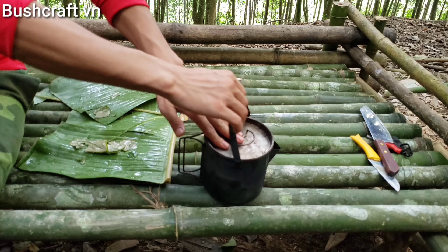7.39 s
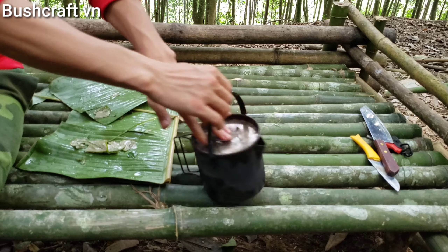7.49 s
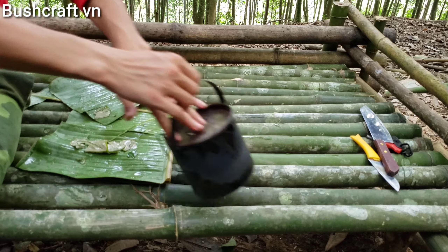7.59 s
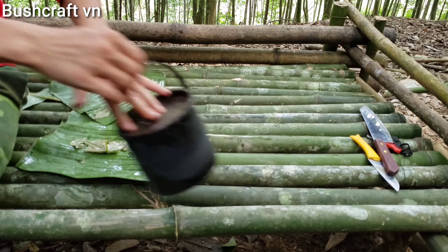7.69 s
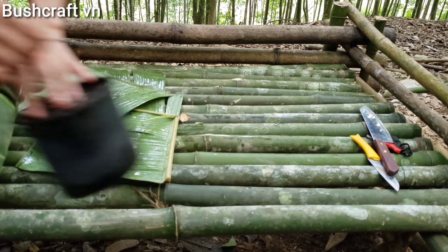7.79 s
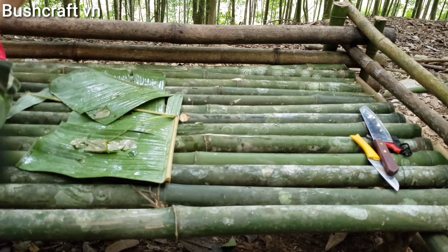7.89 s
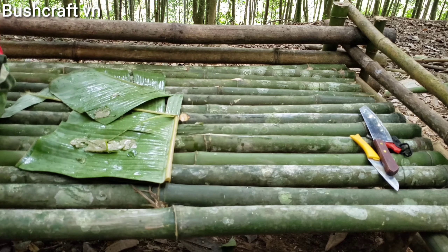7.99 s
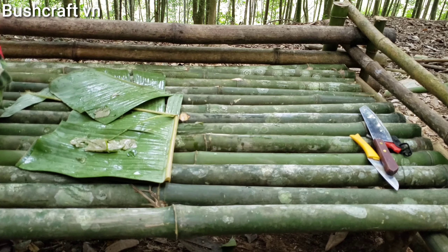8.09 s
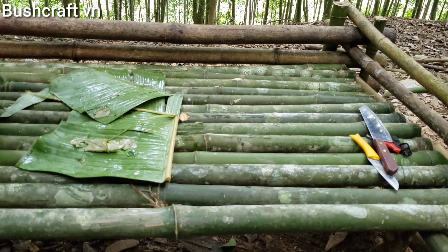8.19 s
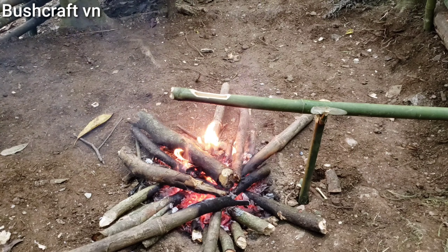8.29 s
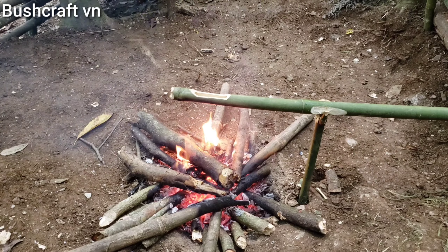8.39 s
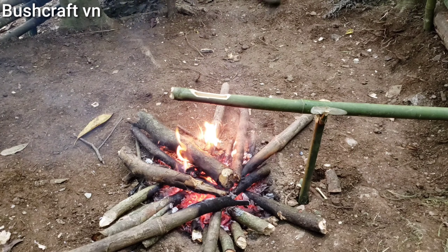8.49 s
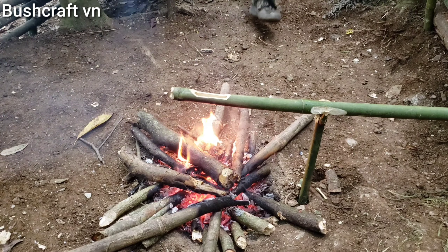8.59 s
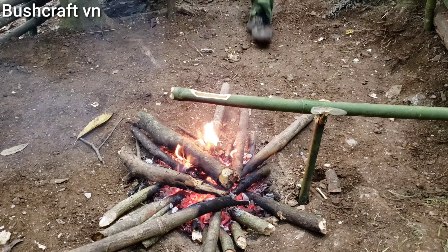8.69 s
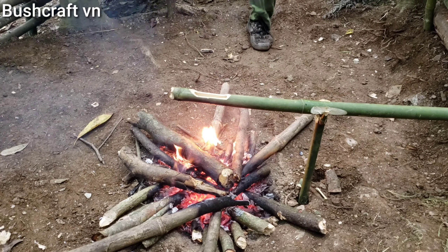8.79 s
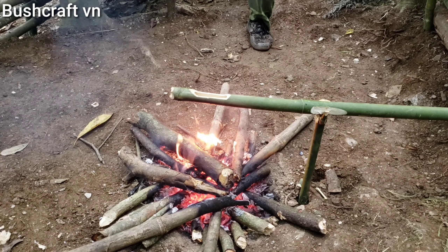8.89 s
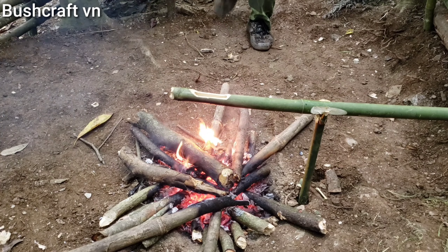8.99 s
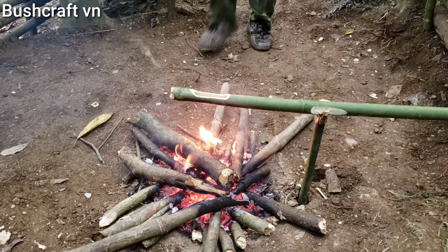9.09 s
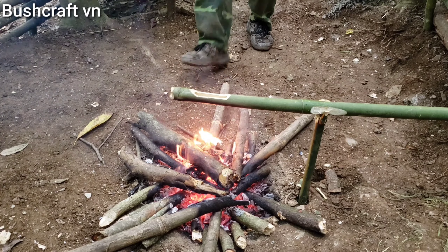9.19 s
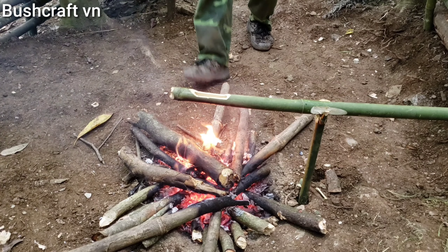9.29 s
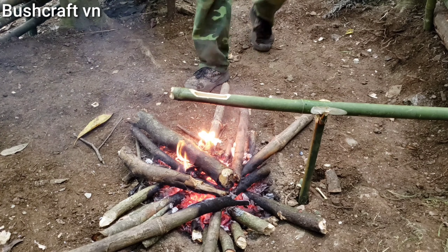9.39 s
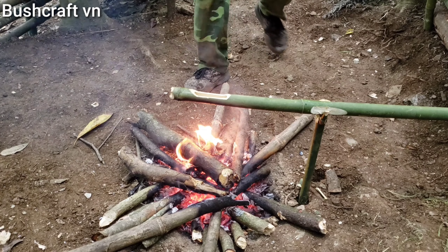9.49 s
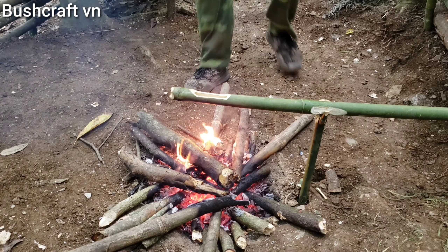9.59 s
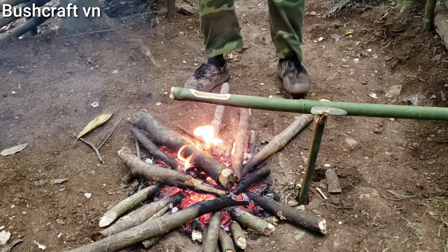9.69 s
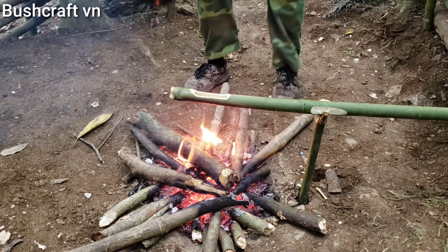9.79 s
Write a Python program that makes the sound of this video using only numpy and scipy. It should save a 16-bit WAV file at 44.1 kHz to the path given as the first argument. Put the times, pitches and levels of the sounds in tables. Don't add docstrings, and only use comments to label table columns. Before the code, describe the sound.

Outdoors in a bamboo forest, cicadas whine steadily and birds give short whips and pips over a soft distant rumble. Close to a stereo microphone pair, a metal pot clanks and rings early on, and fire snaps follow in scattered ticks. A softer pot touch and a hard, damped jangling blow come midway, then dull wooden knocks and sharp bright pops, with soft dove coos at the end.

```python
import sys
import numpy as np
from scipy import signal
from scipy.io import wavfile
from scipy.ndimage import uniform_filter1d

SR = 44100
rng = np.random.default_rng(int(sys.argv[2]) if len(sys.argv) > 2 else 0)


def log_audio(samples):
    frames = np.atleast_2d(samples).T
    limited = np.clip(frames, -1, 1)
    pcm = np.round(limited * 32767).astype(np.int16)
    wavfile.write(sys.argv[1], SR, pcm)


def elevation(decibels):
    levels = np.asarray(decibels, float)
    return 10 ** (levels / 20)


N = 433944


def rms_one(x):
    return x / np.sqrt(np.mean(x ** 2) + 1e-20)


def at_hz(points, hz):
    point_hz, value = np.transpose(points)
    return np.interp(np.log(hz), np.log(point_hz), value)


def time_axis(length_s):
    return np.arange(int(SR * length_s)) / SR


def progress(length_s):
    return np.arange(int(length_s * SR)) / (length_s * SR)


def drift(rate_hz):
    r = np.exp(-80 * np.pi * rate_hz / SR)
    white = rng.standard_normal(N // 40 + 2002)
    slow = signal.lfilter([1], [1, -2 * r, r * r], white)[2000:]
    return np.interp(np.arange(N) / 40, np.arange(len(slow)), rms_one(slow))


def band(x, low_hz, high_hz):
    sos = signal.butter(2, [low_hz, min(high_hz, .45 * SR)], "band", fs=SR, output="sos")
    return signal.sosfilt(sos, x)


def resonance(x, hz, width_hz):
    r = np.exp(-np.pi * width_hz / SR)
    zeros = np.array([1, 0, -1]) * (1 - r * r) / 2
    return signal.lfilter(zeros, [1, -2 * r * np.cos(2 * np.pi * hz / SR), r * r], x)


def add(out, start_s, sound):
    at = round(start_s * SR)
    room = min(sound.shape[-1], N - at)
    out[..., at:at + room] += sound[..., :room]


def place(x, pan_db, left_lag):
    lag = round(left_lag)
    left = np.pad(x, (max(lag, 0), 64))[:len(x)]
    right = np.pad(x, (max(-lag, 0), 64))[:len(x)]
    return np.array([left * elevation(pan_db / 2), right * elevation(-pan_db / 2)])


def scatter(x, t60, delay_s):
    t = time_axis(.8)
    decay = elevation(-60 * t / t60) + 2.0 * elevation(-240 * t / t60)
    tail = rng.standard_normal((2, len(t))) * decay * (1 - np.exp(-t / delay_s))
    tail = tail / np.sqrt(np.sum(tail ** 2) / 2)
    return signal.fftconvolve(x[None], tail, axes=1)[:, :N]


# pitch_hz, likeness (0 to 1)
LIKENESS = [(30, 1), (125, 0.91), (250, 0.81), (500, 0.32), (1000, 0), (4000, 0.043), (16000, 0.081)]


def banded_noise(spectrum, patchy_db):
    out, edges = 0, 24 * 2 ** np.arange(0, 10, .5)
    white = rng.standard_normal((2, 2, N))
    for k, (low, high) in enumerate(zip(edges, edges[1:])):
        hz = np.sqrt(low * high)
        mid, side = band(white[k % 2], low, high)
        alike = np.clip(at_hz(LIKENESS, hz), -1, 1)
        gain = elevation(at_hz(spectrum, hz) + patchy_db * drift(3.5))
        out = out + gain * (np.sqrt(1 + alike) * mid + np.sqrt(1 - alike) * side * [[1], [-1]])
    return rms_one(out)


# time_s, cicada_db, rumble_db, hiss_db
FOREST = [
    (0.0, -54, -51, -61.5),
    (9.7, -54, -50.5, -62.5),
    (9.84, -52, -50, -59),
]


def forest_swell():
    time_s, *levels = np.transpose(FOREST)
    return [elevation(np.interp(np.arange(N) / SR, time_s, level_db)) for level_db in levels]


# pitch_hz, level_db (per Hz)
RUMBLE = [(15, -59), (25, -9.5), (134, -4), (232, -7.5), (430, -7.5), (644, -14.5), (1010, -20),
          (1510, -34), (2120, -40), (2450, -30.5), (4000, -27), (5200, -82), (8800, -120)]


def rumble():
    return elevation(2.0) * banded_noise(RUMBLE, 1.0)


# pitch_hz, level_db (per Hz)
HISS = [(900, -20), (2000, 4), (3500, 3), (6500, -9.5), (8500, 15.5), (12000, -13.5), (15500, 0)]


def leaf_hiss():
    return elevation([[6.5], [5.5]]) * banded_noise(HISS, .8)


# pitch_hz, width_hz, level_db
CICADA_BODY = [(4665, 256, 0.5), (4872, 350, 1.5), (5110, 400, -3)]
CICADA_PATTERN = [-24.5, -13, -4, -19]


def cicadas():
    cycle_hz = 26.24
    turns = np.cumsum(4 * cycle_hz * (1 + .006 * drift(.5))) / SR
    strength = elevation(np.array(CICADA_PATTERN)[turns.astype(int) % 4])
    buckle = strength * np.exp(-(turns % 1) / 0.27)
    chorus = 0.35 * elevation(1.0 * drift(2.9))
    drive = rng.standard_normal((2, N)) * (chorus + buckle)
    body = 0
    for k, (hz, width_hz, level_db) in enumerate(CICADA_BODY):
        body = body + elevation(level_db) * resonance(drive, hz, width_hz) * (-1) ** k
    return elevation(3) * rms_one(band(body, 4450, 5610)) * elevation([[1.0], [-1.0]])


# first_chirp_s, last_chirp_s, level_db
KATYDID = [
    (.2, 2.1, -63.5),
    (4.19, 6.2, -64),
    (7.86, 9.8, -63.5),
]


def katydid():
    pitch_hz, period_s, chirp_s = 8470, 0.237, 0.14
    t, gate = np.arange(N) / SR, np.zeros(N)
    for first_s, last_s, level_db in KATYDID:
        u = (t - first_s) % period_s / chirp_s
        swell = np.sin(np.pi * np.minimum(u, 1)) ** 0.21
        gate += elevation(level_db) * (t > first_s) * (t < last_s) * swell
    rasp = resonance(resonance(rng.standard_normal((2, N)), pitch_hz, 330), pitch_hz, 330)
    return gate * rms_one(rasp) * elevation([[-1.5], [1.5]])


def glide(length_s, from_hz, to_hz, bend, kick=0):
    u = progress(length_s)
    unsteady = 1 + 0.014 * uniform_filter1d(rng.standard_normal(len(u)), size=200) * 14
    goal_hz = to_hz * (1 - kick + kick * u ** 7.5)
    approach_hz = (from_hz - to_hz * (1 - kick)) * (1 - u) ** bend
    return 2 * np.pi * np.cumsum((goal_hz + approach_hz) * unsteady) / SR, u


def whip(length_s, from_hz, to_hz, level_db, late):
    phase, u = glide(length_s, from_hz, to_hz, 1.12, kick=.05 * (late > 2))
    beads = 1 + 0.5 * np.sin(2 * np.pi * 52 * length_s * u + rng.uniform(0, 2 * np.pi))
    swell = np.sin(np.pi * u ** late) ** 0.85 + 0.15 * np.sin(np.pi * u) ** .5
    grain = 1 + 5.5 * uniform_filter1d(rng.standard_normal(len(u)), size=70) * u
    return elevation(level_db + 6.5) * swell * beads * grain * np.sin(phase)


# start_s, length_s, from_hz, to_hz, level_db
LONG_WHIPS = [(.905, .068, 1550, 3550, -48), (1.582, .064, 1800, 3650, -46), (3.792, .05, 2100, 2900, -55),
              (4.876, .066, 1700, 3500, -48), (6.848, .047, 1600, 3550, -46),
              (7.946, .052, 1750, 3500, -51), (8.972, .06, 1800, 3200, -48), (9.148, .054, 2080, 3000, -56),
              (9.23, .06, 1610, 2810, -57), (9.688, .064, 1650, 3700, -45)]


def long_whips(out):
    for start_s, *stroke in LONG_WHIPS:
        add(out, start_s, whip(*stroke, late=3.0))


# start_s, length_s, from_hz, to_hz, level_db
STROKES = [
    (.287, .015, 3550, 3100, -55),
    (.301, .016, 3100, 3600, -53),
    (3.19, .025, 2300, 3900, -57),
    (6.231, .012, 3750, 3150, -55),
    (6.31, .022, 4300, 2500, -56),
    (6.42, .013, 4000, 3000, -58),
    (6.893, .045, 2950, 3120, -49),
    (.968, .022, 2300, 3100, -50),
]


def lone_strokes(out):
    for start_s, *stroke in STROKES:
        add(out, start_s, whip(*stroke, late=1.2))


# start_s, first_stroke_s, from_hz, to_hz, level_db
QUICK_WHIPS = [(1.364, .022, 2200, 3300, -53), (2.051, .023, 2230, 3200, -51),
               (2.722, .038, 2000, 3200, -49), (3.213, .024, 2900, 3600, -54),
               (3.399, .022, 2700, 3800, -57), (5.312, .03, 2250, 3150, -54),
               (7.584, .034, 2250, 3450, -49), (8.729, .024, 2200, 3300, -52)]


def quick_whips(out):
    stroke_s = .021
    for start_s, first_s, from_hz, to_hz, level_db in QUICK_WHIPS:
        second_s = start_s + first_s
        add(out, start_s, whip(first_s, from_hz, to_hz, level_db - 1.5, late=1.2))
        add(out, second_s, whip(stroke_s, from_hz, to_hz, level_db, late=1.2))
        add(out, second_s + stroke_s, whip(stroke_s, from_hz, .94 * to_hz, level_db, late=1.2))


def pipe(length_s, from_hz, to_hz, level_db, octave_db):
    phase, u = glide(length_s, from_hz, to_hz, 5.0)
    hoarse = 1 + .35 * rng.standard_normal(len(u) // 60 + 1).repeat(60)[:len(u)]
    octave = elevation(octave_db) * hoarse * 1.8 * (1 - u) ** 1.3 * np.sin(2 * phase)
    tone = (.6 + .4 * hoarse) * np.sin(phase)
    return elevation(level_db + 6.5) * np.sin(np.pi * u) ** 0.15 * (tone + octave)


# start_s, length_s, held_hz, level_db, octave_db
RASPS = [(0.256, .06, 2220, -63, 10.5), (.905, .04, 2200, -66, 11), (1.574, .05, 2100, -63, 12),
         (2.21, .051, 2117, -64, 9), (2.331, .035, 2095, -63.5, 6), (2.392, .034, 2180, -64, 6),
         (3.875, .04, 2034, -57.5, 6), (3.93, .06, 1865, -60, 6), (4.868, .041, 1905, -61.5, 12),
         (5.637, .06, 1990, -64, 11.5), (5.688, .027, 2410, -61, 7), (5.745, .026, 2230, -60.5, 9.5),
         (5.791, .04, 2110, -64, 9), (5.85, .039, 1960, -65, 7), (6.157, .089, 2290, -59.5, 3),
         (6.236, .082, 2217, -57, 5.5), (6.357, .071, 2186, -58.5, 2), (7.946, .064, 2180, -65.5, 18),
         (8.069, .079, 2183, -62, 15), (8.973, .057, 2200, -68, 9), (9.16, .07, 2130, -66.5, 12),
         (9.278, .082, 2108, -67, 12), (9.687, .042, 2140, -62.5, 12.5)]


def rasps(out):
    for start_s, length_s, held_hz, level_db, octave_db in RASPS:
        add(out, start_s, pipe(length_s, 1520, held_hz, level_db, octave_db))


# start_s, length_s, held_hz, level_db
PIPS = [(0, .014, 2740, -51), (0.234, .028, 2700, -52.5), (0.294, .032, 1750, -54), (.312, .03, 3570, -56),
        (3.472, .04, 2340, -60), (4.408, .03, 2750, -62), (5.283, .038, 1920, -63),
        (6.083, .024, 2700, -48.5), (7.304, .03, 2890, -57), (7.61, .04, 1950, -56),
        (8.08, .055, 2440, -54), (8.087, .041, 1600, -61), (8.669, .045, 2875, -54.5),
        (8.884, .05, 2270, -60)]


def pips(out):
    for start_s, length_s, held_hz, level_db in PIPS:
        add(out, start_s, pipe(length_s, .91 * held_hz, held_hz, level_db, octave_db=-30))


# start_s, held_hz, level_db
WHISTLES = [(1.262, 2660, -61), (5.447, 2640, -60), (7.2, 2750, -63), (7.803, 2665, -57.5),
            (8.021, 2710, -52.5), (8.402, 2640, -58), (9.08, 2180, -58), (9.341, 2930, -58.5),
            (9.45, 2205, -61)]


def whistles(out):
    for start_s, held_hz, level_db in WHISTLES:
        add(out, start_s, pipe(.045, 1.03 * held_hz, held_hz, level_db, octave_db=-30))


# start_s, length_s, level_db
COOS = [
    (9.152, .097, -54),
    (9.348, .12, -57.5),
    (9.525, .19, -60.5),
]


def coos(out):
    coo_hz = 662
    for start_s, length_s, level_db in COOS:
        add(out, start_s, pipe(length_s, .97 * coo_hz, coo_hz, level_db, octave_db=-14))


# start_s, length_s, low_hz, top_hz, level_db
HOOKS = [(4.198, .06, 2700, 3120, -54), (4.432, .066, 2750, 3160, -54), (5.102, .064, 2640, 3100, -53),
         (5.828, .056, 2750, 3250, -51), (6.588, .062, 2500, 3150, -56), (7.123, .062, 2700, 3200, -50),
         (8.354, .06, 2650, 3200, -52), (9.066, .044, 2600, 3060, -53)]
# progress (0 to 1), height (0 low to 1 top), level_db
HOOK = [
    (0, .55, -8),
    (.3, .05, -3),
    (.58, 0, -1.5),
    (.76, 1, 3.5),
    (1, .45, -8),
]


def hooks(out):
    turns, height, swell_db = np.transpose(HOOK)
    for start_s, length_s, low_hz, top_hz, level_db in HOOKS:
        u = progress(length_s)
        phase = 2 * np.pi * np.cumsum(low_hz + (top_hz - low_hz) * np.interp(u, turns, height)) / SR
        beads = 1 + .4 * np.sin(2 * np.pi * 4.5 * u + rng.uniform(0, 2 * np.pi))
        level = elevation(level_db + 6.5 + np.interp(u, turns, swell_db))
        add(out, start_s, level * np.sin(np.pi * u) ** .3 * beads * np.sin(phase))


def birds():
    whips, pipes = np.zeros(N), np.zeros(N)
    for whip_call in (long_whips, lone_strokes, quick_whips):
        whip_call(whips)
    for pipe_call in (hooks, rasps, pips, whistles, coos):
        pipe_call(pipes)
    throat = 1.7 * resonance(whips, 3200, 1550)
    direct = elevation(-1.6) * place(throat, 4, 18) + elevation(-3.5) * place(pipes, 3, -18)
    return direct + elevation(-1.1) * scatter(throat, 0.66, 0.004) + elevation(-2.5) * scatter(pipes, 0.55, 0.016)


# start_s, level_db, pitch_hz, t60_s
THUDS = [(0.463, -43, 615, 0.065), (4.703, -37.5, 632, 0.098), (4.762, -35.5, 614, 0.034),
         (4.913, -45, 556, 0.053), (5.012, -41.5, 470, 0.046), (7.333, -31.5, 563, 0.027),
         (7.4185, -35, 482, 0.026), (8.146, -35.5, 413, 0.033), (8.466, -32.5, 568, 0.022)]


def thuds():
    out, t = np.zeros(N), time_axis(.2)
    for start_s, level_db, pitch_hz, t60_s in THUDS:
        decay = elevation(level_db + 5.5 - 60 * t / t60_s) * (1 - np.exp(-t / 0.0013))
        add(out, start_s - .002, decay * np.sin(2 * np.pi * pitch_hz * t))
    return place(out, 1.0, 0)


# start_s, level_db, hand_damps_after_s, jangle_db, jangle_t60_s
BLOWS = [
    (0.3682, -24, .19, -9, 0.57),
    (3.987, -36.5, 0.048, -12, .12),
    (4.7047, -19, 0.062, 2, 0.15),
]
POT_HZ = [1037, 1062, 1680, 1850, 2089, 2484, 2724, 2933, 3147, 3275, 3844, 4391, 4674, 5233, 5620, 6270,
          6907, 7816, 8333, 9346, 9734, 11340, 11960, 12780, 13480]
# t60_s, first_blow_db, second_blow_db, third_blow_db
POT = [(0.47, -3, -28, -35), (.05, -11, -14, 2), (0.16, -12, -2.5, -20), (.04, 8, -8, -5),
       (0.24, -11.5, -27, -33), (0.29, -32, -21, -12.5), (0.2, -23, -10, -25), (0.79, -13, -25, -16),
       (0.17, -27, -25, -17), (0.3, -23, -25, -11), (0.3, -21, -10, -13.5), (0.08, -21, -9, -4),
       (0.28, -30, -15, -3), (0.25, -21, -15, -29), (0.092, -28, -16, -13), (0.43, -24, -25, -32),
       (0.11, -24, -23, -4.5), (0.1, -17, -2, -7), (0.13, -20, -12, -18), (.12, -35, -25, -9),
       (.13, -29, -25, -19), (0.037, -22, -25, -28), (0.042, -30, -25, -26), (.12, -30, -25, -21),
       (.1, -30, -25, -20)]


def pot():
    pan_db, rattle, wash_db = [1.5, 1.5, -.3], [.3, .3, .4], [-14, -13, -6]
    out, t = np.zeros((2, N)), time_axis(.4)
    for k, (start_s, blow_db, damp_s, jangle_db, jangle_t60_s) in enumerate(BLOWS):
        damped = elevation(blow_db - 380 * np.maximum(t - damp_s, 0))
        blow = elevation(pan_db[k] * np.array([[.5], [-.5]])) * damped * (1 - np.exp(-t / 0.00038))
        for hz, (t60_s, *levels_db) in zip(POT_HZ, POT):
            phase, side_phase = rng.uniform(0, 2 * np.pi), rng.normal(0, 0.48, (2, 1))
            beat = 1 + .2 * np.sin(2 * np.pi * rng.uniform(8, 30) * t + phase)
            chatter = rms_one(uniform_filter1d(rng.standard_normal(len(t)), size=250))
            beat = beat + rattle[k] * (2000 < hz < 4000) * chatter
            ring = np.sin(2 * np.pi * hz * t + phase + side_phase)
            add(out, start_s, blow * beat * elevation(levels_db[k] - 60 * t / t60_s) * ring)
        jangle = band(rng.standard_normal((2, len(t))), 1800, 12400)
        add(out, start_s, blow * elevation(jangle_db - 60 * t / jangle_t60_s) * jangle)
        wash = resonance(rng.standard_normal((2, len(t))), 3250, 700)
        add(out, start_s, elevation(blow_db + wash_db[k] - 110 * t) * wash)
    return out


def embers():
    born = rng.random(N) < 6 / SR
    swell = signal.lfilter([1], [1, -.993], elevation(-57) * born)
    return band(swell * rng.standard_normal((2, N)), 2330, 22000)


def snap(out, start_s, top_db, wood_db, middle_db, t60_s, pan_db):
    t = time_axis(.2)
    white = rng.standard_normal((2, len(t)))
    grains = white * elevation(2.3 * rng.standard_normal(len(t) // 16 + 1).repeat(16)[:len(t)])
    burst = grains * (1 - np.exp(-t / 0.00073)) * elevation(-60 * t / max(t60_s, .004))
    top = band(burst, 4000, 14200) + elevation(middle_db) * band(burst, 2140, 5720)
    wood = band(burst, 740, 3320) + 2.17 * resonance(burst, 1800, 216)
    mid, side = elevation(top_db - 4) * top + elevation(wood_db + 5.5) * wood
    add(out, start_s - .0005, place(mid, pan_db, -3.0 * pan_db) + 0.17 * side * [[1], [-1]])


# start_s, wood_db
TAPS = [(0.139, -51), (0.6104, -43), (1.2044, -41.5), (3.7013, -46.5), (3.7754, -51), (3.79, -46),
        (4.9134, -40), (5.0082, -48), (5.2947, -44), (5.3363, -41.5)]


def taps(out):
    for start_s, wood_db in TAPS:
        snap(out, start_s, -45, wood_db, middle_db=-2, t60_s=.048, pan_db=0.5)


# start_s, top_db, wood_db
TICKS = [(0.683, -41, -56), (1.08, -38, -60), (1.1109, -33.5, -47), (1.1912, -37, -46), (1.4017, -44, -56),
         (1.6571, -36, -51), (2.1261, -36.5, -58), (2.3441, -41, -58), (2.371, -37, -59),
         (2.6529, -40, -64), (2.679, -30, -56), (2.8544, -40, -57), (2.9921, -38, -57), (3.8063, -37, -52),
         (3.822, -37, -59), (3.8297, -35, -53), (4.1939, -38.5, -67), (5.2018, -39.5, -49.5),
         (8.4173, -39, -49), (8.6744, -46, -61)]


def ticks(out):
    for start_s, top_db, wood_db in TICKS:
        snap(out, start_s, top_db, wood_db, middle_db=-2, t60_s=.048, pan_db=1.2)


# start_s, top_db, wood_db, t60_s
CRACKS = [
    (6.8208, -47, -43, .03),
    (7.391, -27, -33, .03),
    (7.4185, -24, -35, .027),
]


def cracks(out):
    for start_s, top_db, wood_db, t60_s in CRACKS:
        snap(out, start_s, top_db, wood_db, middle_db=1.5, t60_s=t60_s, pan_db=0.5)


# start_s, top_db (4-14 kHz), wood_db (0.7-3.3 kHz), middle_db (over top), pan_db
POPS = [(0.3693, -28, -21.5, 2, 2.5), (0.4651, -28, -24, -9, 3.5), (0.4724, -27, -27, 6, 2),
        (0.482, -18, -26, -2.5, 4.5), (0.4912, -17.5, -28, -4, 2), (0.4968, -22, -26, 5, 1),
        (0.614, -34, -44.5, 4, 1), (1.4685, -31, -45, -7, 1), (2.402, -29, -50, -2, 1),
        (3.8841, -23, -41, -2, 3), (3.8916, -24, -42, -2.5, -0.5), (3.9881, -18.5, -31.5, 1, 2),
        (4.4051, -28.5, -42, 0, -1), (4.7051, -13, -19.5, 7, 0), (4.7707, -30, -37.5, 2, -1.5),
        (7.656, -25, -33, 9, 2), (7.6782, -25, -51, -9, 2.5), (7.692, -27, -44, 3, 2),
        (8.1404, -23, -44, 5, 3.5), (8.1446, -19, -45, 6, 8), (8.1524, -20, -37, -12, 2),
        (8.1527, -16.5, -48, 4, 4), (8.4659, -11, -25, 1, 9.5)]


def pops(out):
    for start_s, top_db, wood_db, middle_db, pan_db in POPS:
        t60_s = min(.03 - .0022 * (top_db + 10), .062)
        snap(out, start_s, top_db, wood_db, middle_db, t60_s, pan_db)


def fire():
    out = embers()
    for kind in (taps, ticks, cracks, pops):
        kind(out)
    return out


def scene():
    cicada_gain, rumble_gain, hiss_gain = forest_swell()
    air = rumble_gain * rumble() + hiss_gain * leaf_hiss()
    insects = cicada_gain * cicadas() + katydid()
    near = thuds() + pot() + fire()
    return near + elevation(-11.5) * scatter(near.mean(axis=0), 0.42, 0.0033) + birds() + insects + air


def roll_off(x):
    return signal.sosfilt(signal.butter(12, 16390, fs=SR, output="sos"), x)


def record(dry):
    bass_cut = signal.butter(3, 48.6, "high", fs=SR, output="sos")
    top_cut = signal.cheby2(10, 50, 16740, fs=SR, output="sos")
    mix = signal.sosfilt(top_cut, signal.sosfilt(bass_cut, dry))
    return roll_off(mix)


dry = scene()
out = record(dry)
log_audio(out)
```